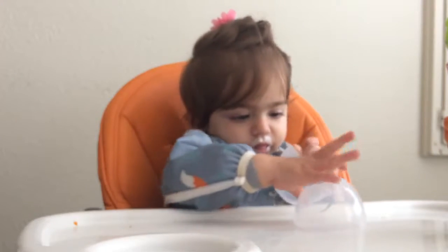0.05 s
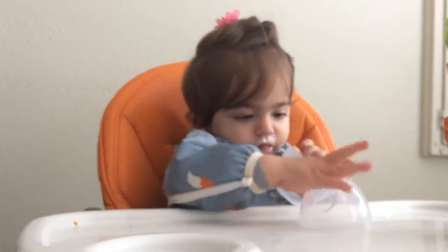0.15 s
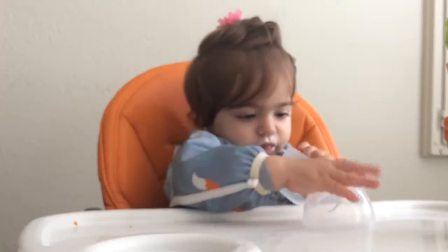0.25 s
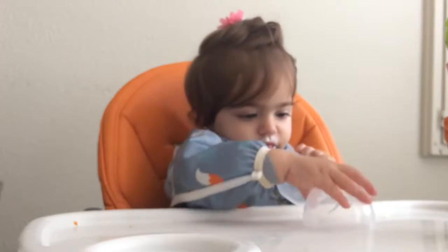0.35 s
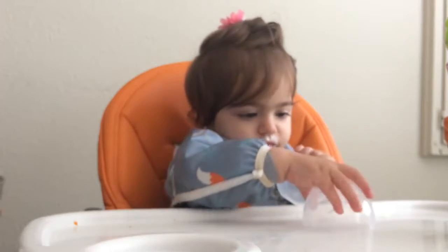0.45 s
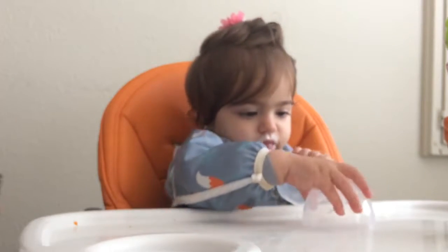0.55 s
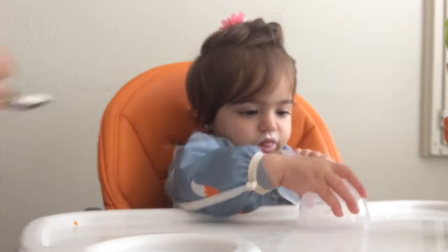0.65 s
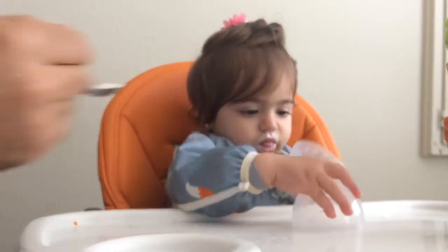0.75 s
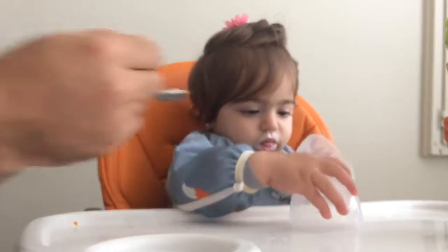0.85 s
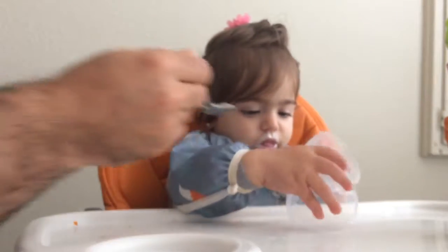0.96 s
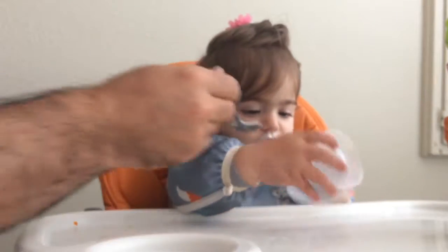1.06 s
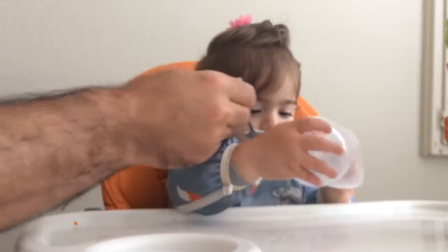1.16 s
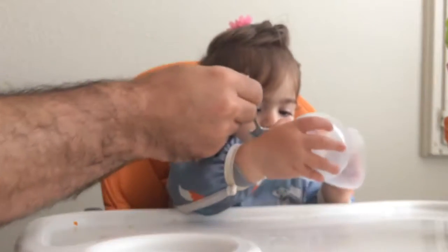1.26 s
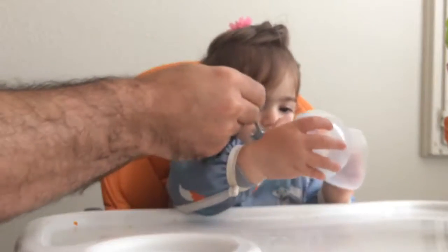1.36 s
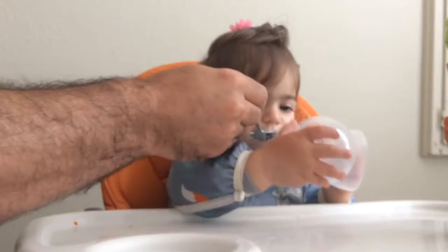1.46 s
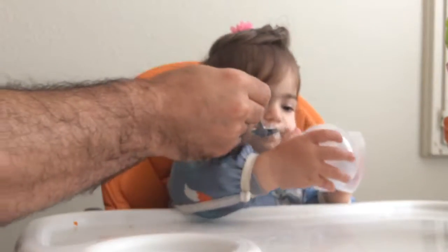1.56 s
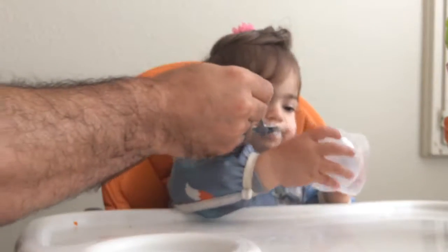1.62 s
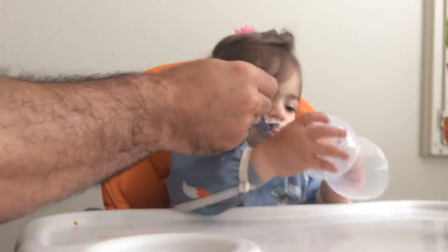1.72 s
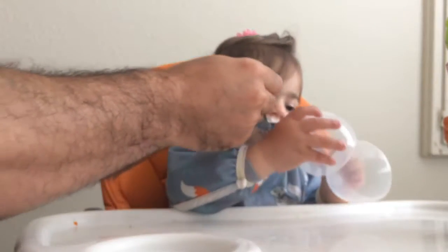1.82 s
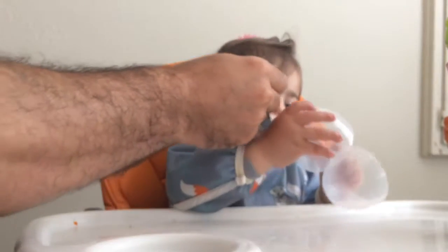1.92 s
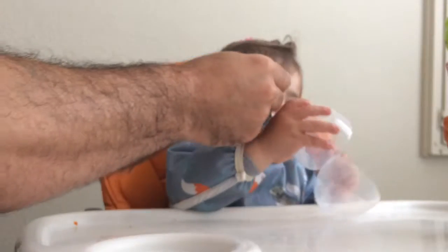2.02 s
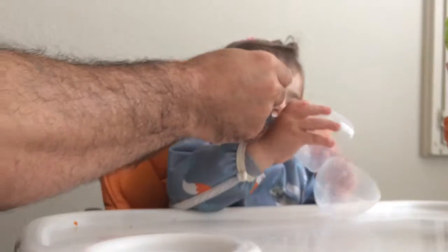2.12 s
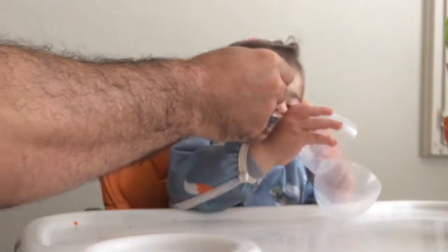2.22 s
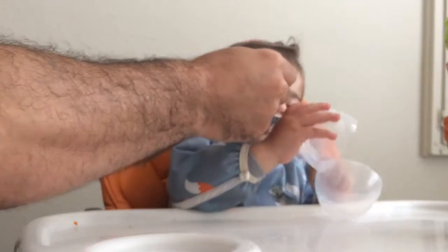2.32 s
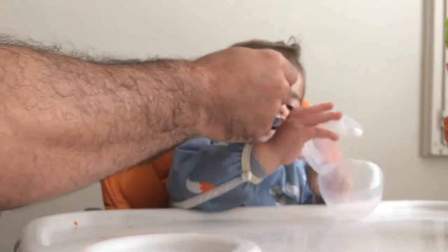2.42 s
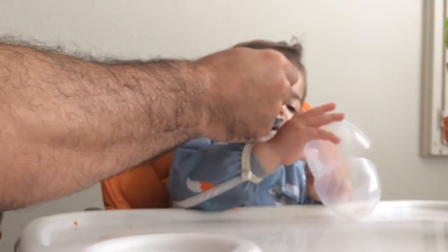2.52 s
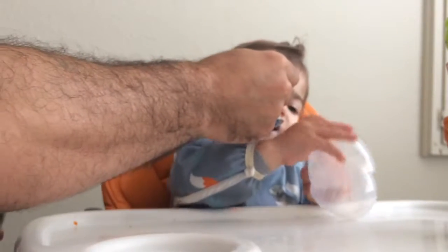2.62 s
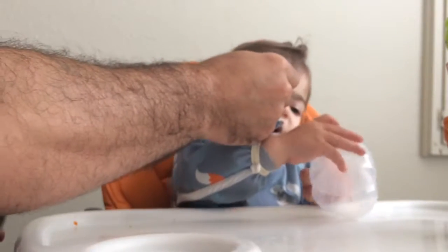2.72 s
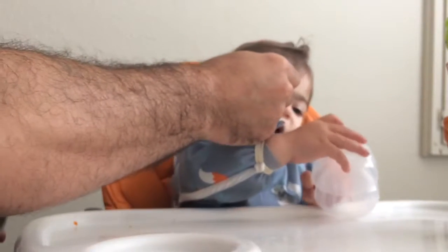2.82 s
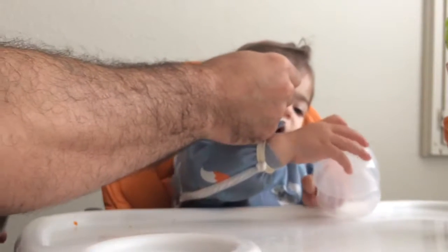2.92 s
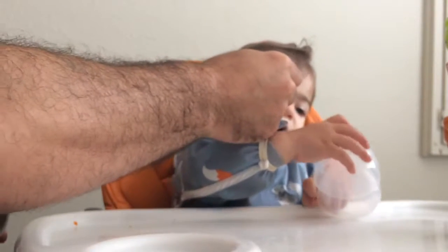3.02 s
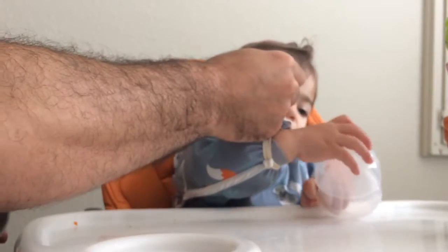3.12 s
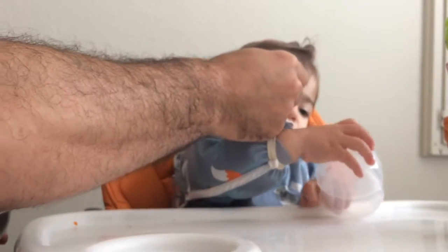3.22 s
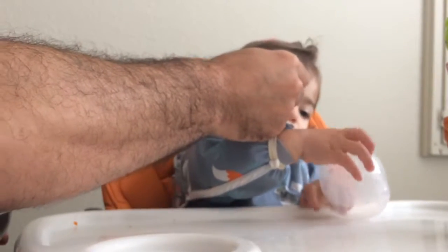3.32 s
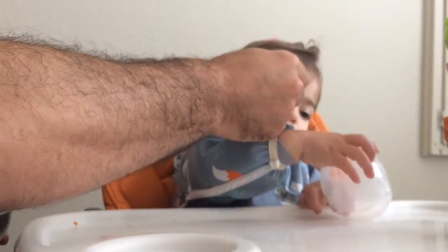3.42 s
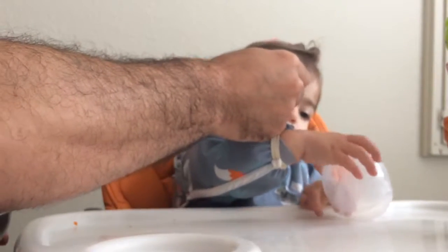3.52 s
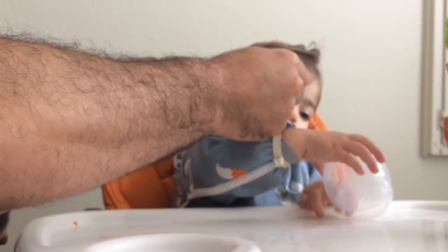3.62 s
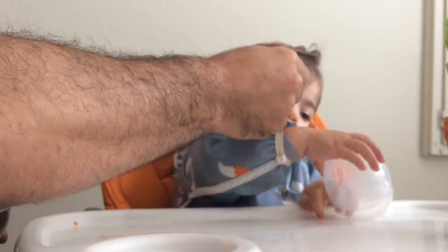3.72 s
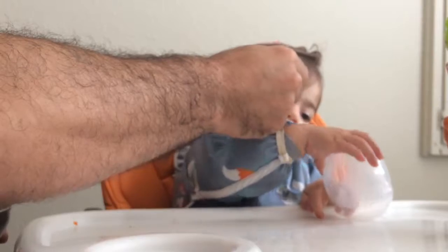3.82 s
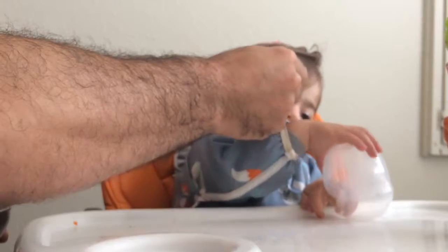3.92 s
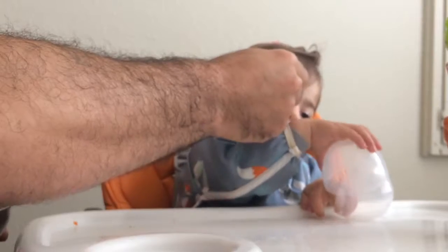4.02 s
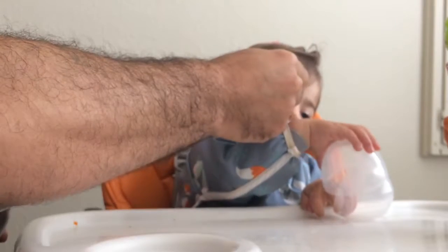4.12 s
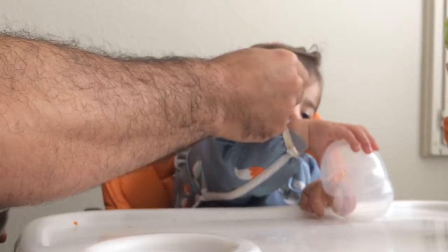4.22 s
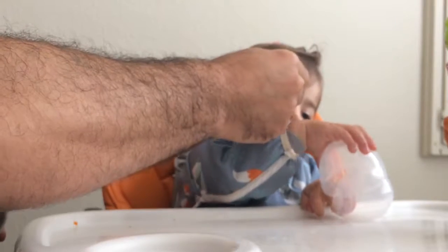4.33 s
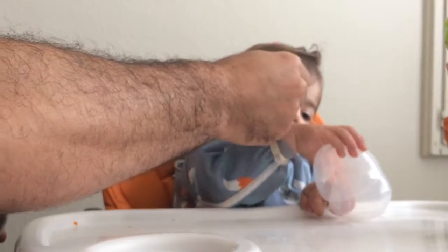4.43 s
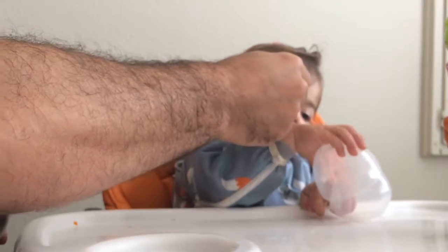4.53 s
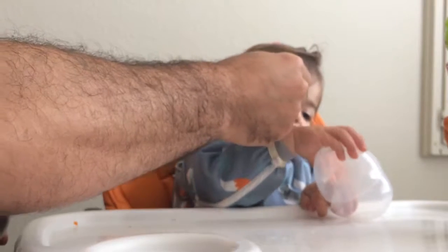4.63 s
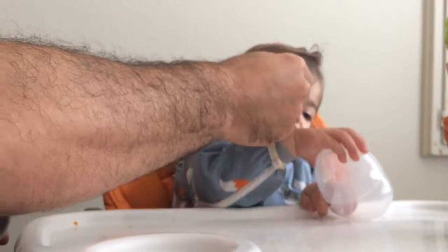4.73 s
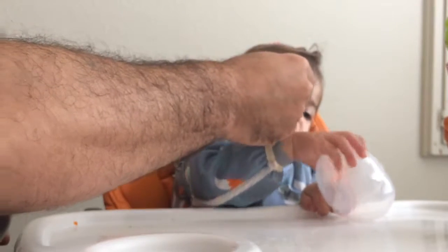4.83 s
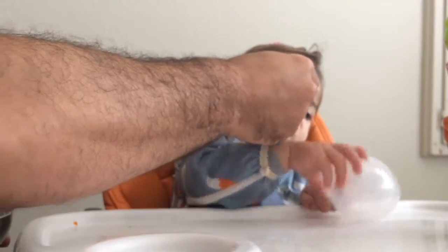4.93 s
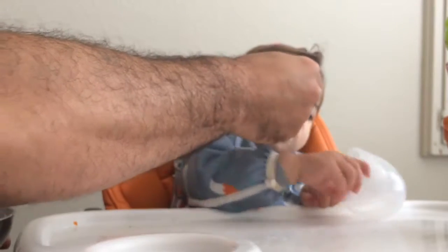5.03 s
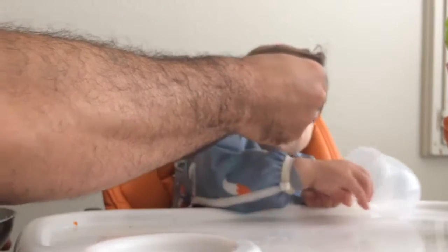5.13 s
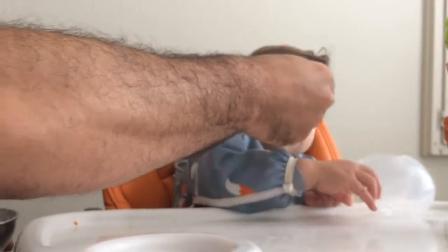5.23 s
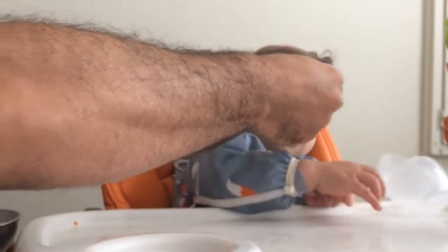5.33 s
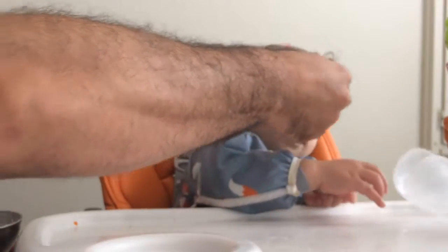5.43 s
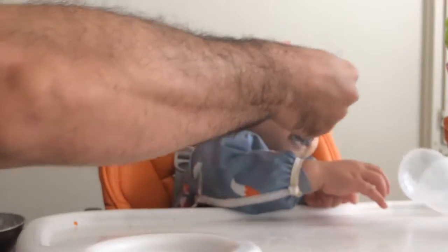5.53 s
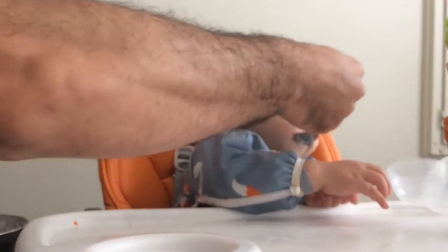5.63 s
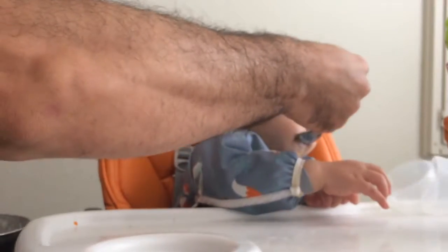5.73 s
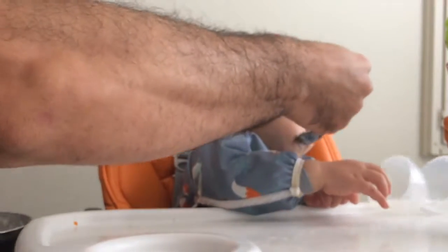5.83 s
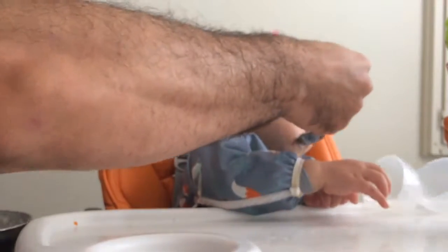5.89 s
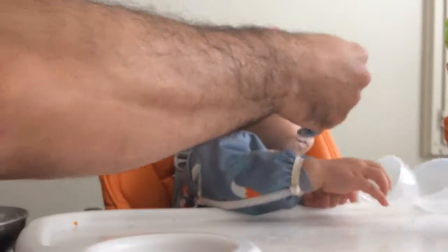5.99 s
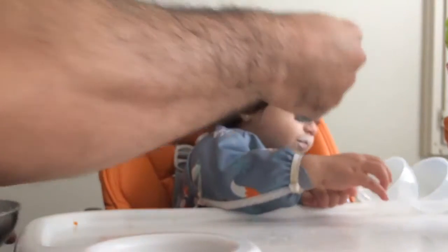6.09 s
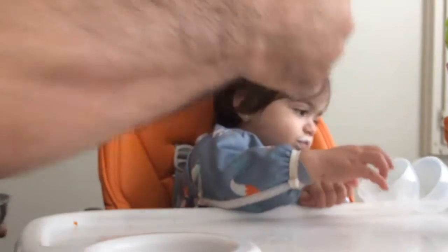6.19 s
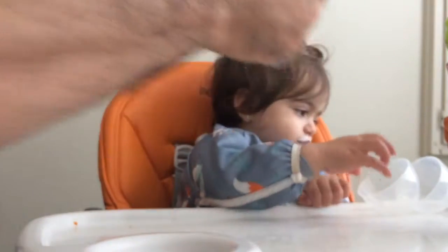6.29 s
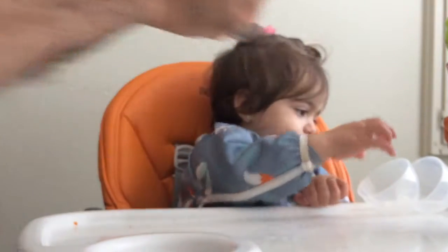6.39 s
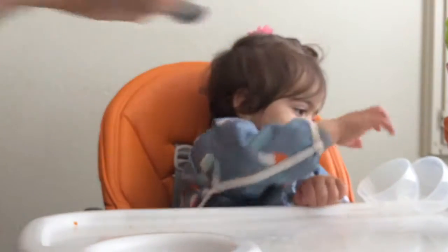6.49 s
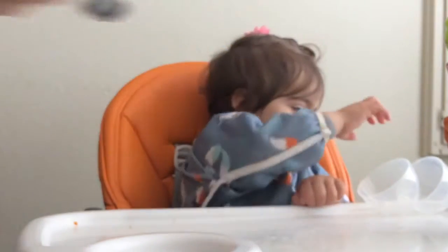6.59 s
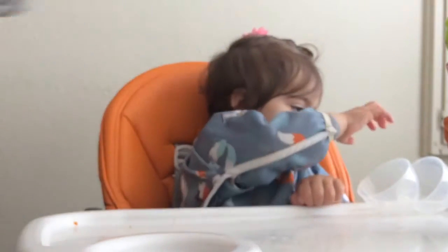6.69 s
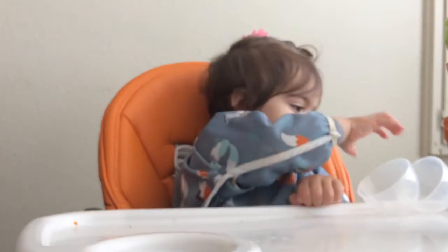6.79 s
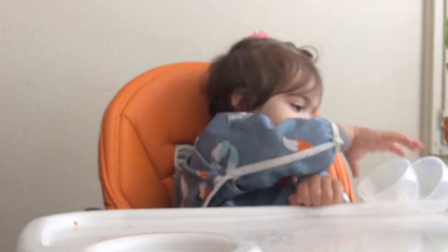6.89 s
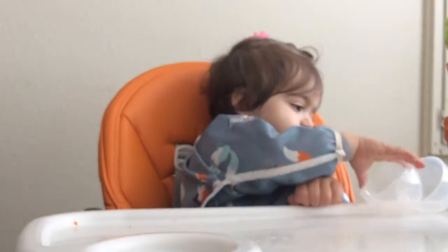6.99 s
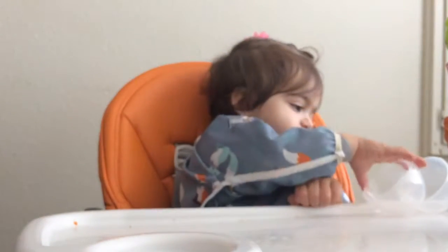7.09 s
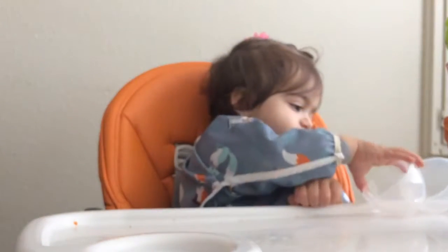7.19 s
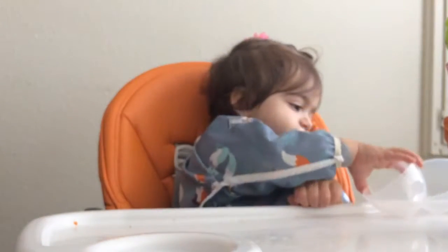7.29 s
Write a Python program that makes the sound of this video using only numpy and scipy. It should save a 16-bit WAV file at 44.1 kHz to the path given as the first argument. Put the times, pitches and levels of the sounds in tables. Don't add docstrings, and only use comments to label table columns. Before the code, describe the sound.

A faint spoon scrape on a metal dish, then light plastic bowls knocking and clattering on a plastic tray over a quiet refrigerator hum.

```python
import sys
import numpy as np
from scipy import signal
from scipy.fft import rfft, irfft
from scipy.io import wavfile
from scipy.ndimage import uniform_filter1d

SR = 44100
rng = np.random.default_rng(int(sys.argv[2]) if len(sys.argv) > 2 else 0)


def invert_db(level):
    return 10 ** (np.asarray(level, dtype=float) / 20)


def log_audio(samples):
    frames = np.atleast_2d(samples).T
    limited = np.clip(frames, -1, 1)
    pcm = np.round(limited * 32767).astype(np.int16)
    wavfile.write(sys.argv[1], SR, pcm)


N = 324135

# start_s, wall_db, wall_pitch_hz, rim_crack_db, wall_t60_s
KNOCKS = [(1.7222, -19.5, 1220, -23.5, 0.0066), (2.16, -27, 1380, -25.5, 0.013),
          (2.7311, -19, 1200, -26.5, 0.017), (5.051, -30, 1110, -19, 0.02602),
          (5.063, -33, 834, -50, 0.016), (5.1101, -27.5, 1000, -25.5, 0.016),
          (5.142, -36, 1000, -42, 0.02706), (5.4093, -23.5, 774, -29.5, 0.019),
          (5.465, -37, 878, -40, 0.01595), (5.5064, -49.5, 781, -39, .02), (5.5139, -45, 1130, -44, .035),
          (5.5721, -36.5, 1090, -31.5, 0.00962), (5.5917, -35, 1096, -30.5, 0.02085),
          (5.6004, -36, 1095, -40, 0.01461), (5.6638, -42.5, 1130, -39, 0.01378),
          (5.8615, -28, 816, -32, 0.016), (5.936, -43.5, 750, -56, .03), (5.969, -18.5, 1450, -22.5, 0.023),
          (5.9935, -33.5, 888.2, -36, 0.02008), (6.0127, -30, 1489, -54, 0.01755)]
# start_s, wall_db, wall_pitch_hz, rim_crack_db, rim_pitch_hz
CLINKS = [(2.464, -51, 1170, -55, 5000), (2.637, -41, 1080, -50, 6150), (2.6667, -44, 1100, -58, 4750),
          (2.831, -35, 1008, -30.5, 4470), (5.08, -20.5, 1050, -10.5, 4830),
          (5.2637, -35.5, 1587, -33.5, 5100), (5.2789, -33, 904.8, -39.5, 4900),
          (5.288, -39, 1060, -52, 4900), (5.309, -50.5, 1000, -58, 4900), (5.3249, -44.5, 894.1, -52, 6230),
          (5.6483, -42, 891.9, -34.5, 5623), (5.7807, -38.5, 1082, -31, 5770),
          (5.797, -43, 1160, -35, 5933), (5.897, -48, 780, -36, 6230), (5.9237, -46, 760, -46, 5940),
          (6.0418, -29.5, 1330, -44, 5720)]
# share_of_pitch, level_db, share_of_t60
WALL_MODES = [(1.0, 3, 0.79), (1.059, 4.5, 0.32), (0.8058, -19, 0.99)]
FAINT_DB = -19


def evened(x):
    return x / np.sqrt(np.mean(x ** 2) + 1e-20)


def read(points, hz):
    f, value = np.transpose(points)
    return np.interp(np.log(hz + 1), np.log(f + 1), value)


def add(mix, s, sound):
    part = mix[round(s * SR):][:len(sound)]
    part += sound[:len(part)]


def level(rows):
    s, db = np.transpose(rows)[:2]
    return invert_db(np.interp(np.arange(N) / SR, s, db, -120, -120))


def stroke(start, end, db, rise_s, fall_s, faint_db):
    return level([
        (start - abs(rise_s), db + faint_db),
        (start, db),
        (end, db),
        (end + abs(fall_s), db + faint_db),
    ])


def coloured(points):
    hz = np.fft.rfftfreq(N, 1 / SR)
    return evened(irfft(rfft(rng.standard_normal(N)) * invert_db(read(points, hz)), N))


def slow(rate_hz):
    return evened(signal.lfilter(*signal.butter(2, 2 * rate_hz / SR), rng.standard_normal(N)))


def resonate(x, hz, width):
    turn = np.exp(2j * np.pi * np.cumsum(hz * np.ones(len(x))) / SR)
    r = np.exp(-np.pi * width / SR)
    return 2 * (turn * signal.lfilter([1 - r], [1, -r], x / turn)).real


def ring(db, hz, modes, chance, stretch=0.94, spread=0.03, hardness=1.7):
    t = np.arange(SR // 5) / SR
    out = np.zeros(len(t))
    for k, ((share, mode_db, t60), luck) in enumerate(zip(sorted(modes), chance)):
        f = hz * share * (1 + spread * np.clip(luck, -1, 1) * (share != 1))
        rise = 1 - np.exp(-t * f * hardness)
        fall = invert_db(mode_db - 60 * t / (t60 * abs(stretch)))
        out += (-1) ** k * fall * np.sin(2 * np.pi * f * t) * rise
    return invert_db(db) * out


def contact(s, lag=0.00091):
    times = np.transpose(KNOCKS + CLINKS)[0]
    return times[np.argmin(abs(times - s))] + lag


def refrigerator():
    # pitch_hz, level_db
    motor_tones = [(102.8, -51.5), (205.6, -65), (244, -67.5)]
    # pitch_hz, width_hz, level_db
    fan_bands = [(1495.1, 91, -71), (1770.3, 28, -66), (1638.2, 383.97, -62.5), (4838.5, 93.05, -77),
                 (6890.4, 28.05, -70.5), (7085.3, 247.6, -70), (8230, 49.5, -72.5), (9012, 880, -74.5),
                 (11030, 90, -83)]
    # pitch_hz, level_db (per Hz)
    air_colour = [(18, -40.5), (32, -10), (75, -12.5), (140, -7), (244, -15), (361, -14.5), (600, -23.5),
                  (1180, -27), (2900, -35.5), (3900, -31.5), (5210, -33), (7100, -24.5), (12000, -30.5),
                  (16600, -37.5), (17500, -70)]
    turns = np.cumsum(1 + 0.003856 * slow(1.09)) / SR
    motor = sum(invert_db(db + 1.5 + 0.48 * slow(5.7)) * np.sin(2 * np.pi * hz * turns) for hz, db in motor_tones)
    hiss = np.zeros(N)
    for hz, width, db in fan_bands:
        band = resonate(resonate(rng.standard_normal(N), hz, width), hz, 2 * width)
        hiss += invert_db(db + 1.469 * slow(8.9)) * evened(band)
    air = invert_db(-54.5 + 0.7503 * slow(1.5)) * coloured(air_colour)
    return motor + hiss + air


def spoon():
    # pitch_hz, width_hz, level_db
    dish_bands = [(3808.4, 190, 7.5), (4900, 300, -14.5), (5804, 839, 3)]
    # time_s, pitch_hz, level_db
    squeak_path = [
        (6.16, 1950, -79),
        (6.2, 2152, -57.5),
        (6.23, 2207, -70),
        (6.28, 2110, -78),
    ]
    hold_s, end_s = 0.1742, 0.2779
    t = np.arange(N) / SR
    slips = rng.standard_normal(N) * invert_db(2.0 * slow(35))
    dish = np.zeros(N)
    for hz, width, db in dish_bands:
        dish += invert_db(db) * resonate(resonate(slips, hz, width), hz, 3 * width) / np.sqrt(width)
    haze = invert_db(2) * evened(resonate(resonate(slips, 3954, 3334), 4300, 3600))
    scrape = (evened(dish) + haze) * stroke(0, hold_s, -62.5, 1, end_s - hold_s, FAINT_DB)
    sag_hz = np.interp(t, [.06, .14], [2760, 2620])
    chime = evened(resonate(resonate(slips, sag_hz, 110), sag_hz, 300)) * invert_db(-61 - 60 * t / 0.7116)
    add(chime, .383, ring(-55, 3196, WALL_MODES, np.zeros(3), stretch=.02))
    s, hz, db = np.transpose(squeak_path)
    glide_hz = np.interp(t, s, hz)
    squeak = evened(resonate(rng.standard_normal(N), glide_hz, 70)) * level(np.transpose([s, db]))
    return scrape + chime + squeak


def brushing():
    # start_s, peak_db, length_s
    brushes = [
        (0.783, -73, 0.1123),
        (1.135, -70.5, 0.0726),
        (2.354, -69, .14),
        (4.132, -75, 0.0657),
        (4.986, -77, 0.1305),
        (5.788, -68, 0.0402),
        (5.862, -65.5, 0.066),
        (6.68, -80, .1),
    ]
    # pitch_hz, level_db (per Hz)
    cloth_colour = [(350, -49), (600, -69), (753, -13), (1910, 0.5), (2340, -5.5), (5340, -13.5),
                    (7010, -11.5), (9000, -11), (11700, -36), (19800, -120)]
    slips = invert_db(2.5 * rng.standard_normal(N // 64 + 1)).repeat(64)[:N]
    strokes = sum(stroke(s, s, db, 0.01655, length, -14) for s, db, length in brushes)
    return evened(coloured(cloth_colour) * slips) * invert_db(15.0) * strokes


def rocking():
    # start_s, end_s, level_db
    spells = [
        (4.965, 5.044, -55.5),
        (5.124, 5.67, -55),
        (5.852, 6.07, -53.5),
    ]
    # pitch_hz, level_db (per Hz)
    plate_colour = [(150, -14), (300, -4), (500, -0.5), (900, -7.5), (1300, -7), (2200, -16), (4000, -22),
                    (8000, -30), (14000, -60)]
    rise_s, fall_s = .12, 0.0853
    bumps = invert_db(3 * np.minimum(rng.exponential(1, N), 3)) * (rng.random(N) < 600 / SR)
    shapes = coloured(plate_colour)[:8 * 1024].reshape(8, 1024) * invert_db(-60 * np.arange(1024) / SR / 0.026)
    patches = np.zeros(N)
    for k, shape in enumerate(shapes):
        patches += signal.oaconvolve(bumps * (np.arange(N) % 8 == k), shape)[:N]
    strokes = sum(stroke(*row, rise_s, fall_s, FAINT_DB) for row in spells)
    return evened(patches) * invert_db(-2.5) * strokes


def tray():
    # start_s, thud_db, pitch_hz
    thuds = [(2.16, -21.5, 507.8), (2.73, -39, 430), (5.05, -30.5, 533), (5.064, -47, 512),
             (5.08, -29, 525), (5.11, -51, 566.7), (5.14, -45, 592), (5.264, -47.5, 473.7),
             (5.28, -42.5, 400), (5.324, -50, 386.9), (5.41, -22.5, 490), (5.465, -51, 468.3),
             (5.59, -42.5, 578.6), (5.648, -48.5, 424), (5.862, -44.5, 517), (5.897, -48, 610),
             (5.969, -33, 231), (5.994, -42.5, 540), (6.043, -43.5, 422.3)]
    # share_of_pitch, level_db, share_of_t60
    tray_modes = [(1.0, 9.5, 0.6344), (0.5699, -7, 0.754), (1, -19, 2.9), (0.438, -1.5, 1.1367)]
    # blow_db, t60_s
    tray_t60 = [(-38.5, 0.0633), (-24, 0.01887)]
    # start_s, level_db, pitch_hz
    overtones = [(1.722, -22.5, 1624), (1.722, -52, 3930), (1.722, -45, 2422), (1.722, -45, 570.4),
                 (2.16, -24.5, 2260), (2.16, -34.5, 376), (2.16, -49, 139.9), (2.16, -30.5, 646),
                 (2.16, -30.5, 971.3), (2.16, -34, 2980), (2.731, -28, 1408), (2.16, -29.5, 1830),
                 (2.16, -36, 264.8), (2.731, -37, 2332), (5.05, -37, 614), (5.08, -28, 2898),
                 (5.142, -27.5, 3504), (5.264, -36.5, 1031), (5.28, -34.5, 585), (5.41, -28.5, 1140),
                 (5.41, -37.5, 257.6), (5.41, -31, 2200), (5.572, -45, 2881), (5.592, -34, 2317),
                 (5.862, -39.5, 2908), (5.862, -38.5, 1190), (5.969, -30, 372), (5.969, -29.5, 620),
                 (5.969, -31, 990)]
    out, chance = np.zeros(N), rng.standard_normal((len(thuds), 4))
    for (s, db, hz), luck in zip(thuds, chance):
        t60 = np.interp(db, *np.transpose(tray_t60))
        add(out, contact(s), ring(db, hz, tray_modes, luck, stretch=t60))
    for s, db, hz in overtones:
        add(out, contact(s), ring(db, hz, WALL_MODES[:1], [1], stretch=24.4 / hz))
    return out


def rim(db, hz, chance, fall_db=11.0):
    # pitch_hz, level_db, t60_s
    rim_tones = [(2684.5, 6, 0.0034), (3380, -4, 0.0099), (3750, 4, 0.006578), (5040, -3, 0.011),
                 (5900, -1.5, 0.013), (7000, -3.5, 0.013)]
    modes = [(f / hz, mode_db - fall_db * abs(np.log2(f / hz)), t60) for f, mode_db, t60 in rim_tones]
    return ring(db, hz, modes, chance, stretch=0.72, spread=0.05412)


def bowls():
    # start_s, level_db, pitch_hz
    singing = [
        (2.731, -37.5, 1190),
        (5.08, -45, 1014.5),
        (5.969, -50.5, 1432),
    ]
    dull_rim_hz, clink_t60_s = 3460, 0.017
    rows = [(*row, dull_rim_hz) for row in KNOCKS]
    rows += [(*row[:4], clink_t60_s, row[4]) for row in CLINKS]
    out, chance = np.zeros(N), rng.standard_normal((len(rows), 12))
    grit = rng.standard_normal((len(rows), 256))
    tick_fall = invert_db(-60 * np.arange(256) / SR / 0.009686)
    bright = signal.butter(2, [6500 / (SR / 2), 13000 / (SR / 2)], "band")
    for (s, db, hz, rim_db, t60, rim_hz), luck, g in zip(rows, chance, grit):
        s = contact(s)
        add(out, s, ring(db + 4.5, hz, WALL_MODES, luck[:3], stretch=t60, hardness=3.8))
        add(out, s, ring(db - 7.5, 1613, WALL_MODES, luck[3:6], stretch=0.018, hardness=8.4))
        add(out, s, rim(rim_db - 2.5, rim_hz, luck[6:]))
        tick = signal.lfilter(*bright, g * tick_fall)
        add(out, s, invert_db(rim_db - 9.5) * tick)
    for s, db, hz in singing:
        add(out, contact(s), ring(db, hz, WALL_MODES[:1], [1], stretch=0.17))
    return out


def room(x):
    # pitch_hz, t60_s
    room_t60 = [(200, 0.6734), (600, 0.2625), (1500, 0.3109), (4000, 0.45), (10000, 0.33)]
    # pitch_hz, level_db
    wall_colour = [(200, -0.5), (1000, -2.5), (2000, -4), (3000, -1.5), (5500, -9), (10000, -7.5)]
    room_db, shifts_per_s = -9, 11
    taps = np.zeros((3, SR // 2))
    at = np.arange(round(.006 * SR), SR // 2 - 20, 20)
    places = at + rng.integers(0, 20, (3, len(at)))
    np.put_along_axis(taps, places, rng.choice([-1., 1.], (3, len(at))), 1)
    hz, t, z = signal.stft(taps, SR, nperseg=256)
    dying = invert_db(-60 * t / read(room_t60, hz)[:, None])
    dying = dying + invert_db(15 - 60 * t / 0.035)
    tails = signal.istft(z * invert_db(read(wall_colour, hz))[:, None] * dying, SR, nperseg=256)[1]
    turn = shifts_per_s * np.arange(N) / SR + np.arange(3)[:, None] / 3
    spots = np.sqrt(2 / 3) * np.cos(np.pi * turn)
    echoes = signal.oaconvolve(x * spots, tails * invert_db(room_db) / np.linalg.norm(tails[0]), axes=1)
    return x + echoes.sum(0)[:N]


def scene():
    mono = refrigerator() + spoon() + brushing() + room(rocking() + tray() + bowls())
    return np.array([mono, mono])


def band_limit(x):
    return signal.sosfilt(signal.butter(12, 16670, fs=SR, output="sos"), x)


def record(dry):
    # pitch_hz, level_db (from its usual level)
    holes = [(7000, -10), (9000, -4.8), (12000, -2), (14000, -.3), (15700, .5), (15900, 9), (16600, 11)]
    hz, t, z = signal.stft(dry, SR, nperseg=2048, noverlap=1024)
    power = uniform_filter1d(uniform_filter1d(abs(z) ** 2, size=2, axis=2), size=5, axis=1)
    band_db = 10 * np.log10(abs(power) + 1e-20)
    usual_db = np.median(band_db, axis=2, keepdims=True)
    strong = band_db > usual_db + read(holes, hz)[:, None]
    kept = strong | (hz < holes[0][0])[:, None]
    mix = signal.istft(z * kept, SR, nperseg=2048, noverlap=1024)[1][:, :N]
    return band_limit(mix)


dry = scene()
out = record(dry)
log_audio(out)
```